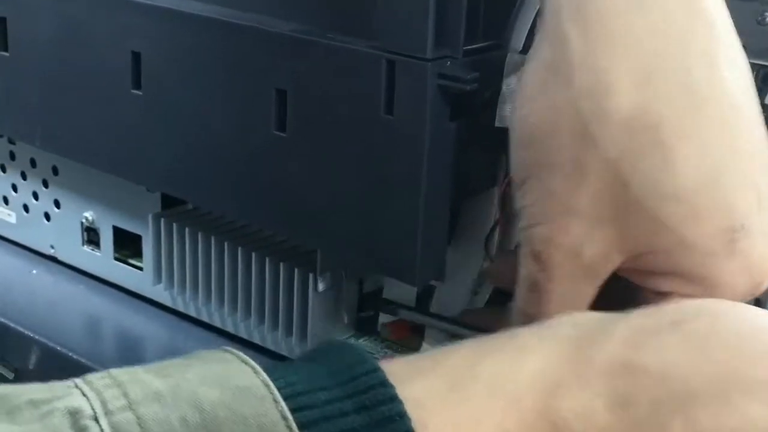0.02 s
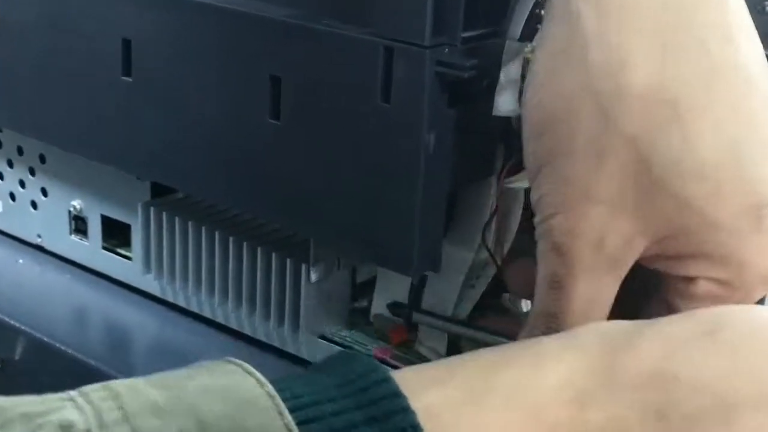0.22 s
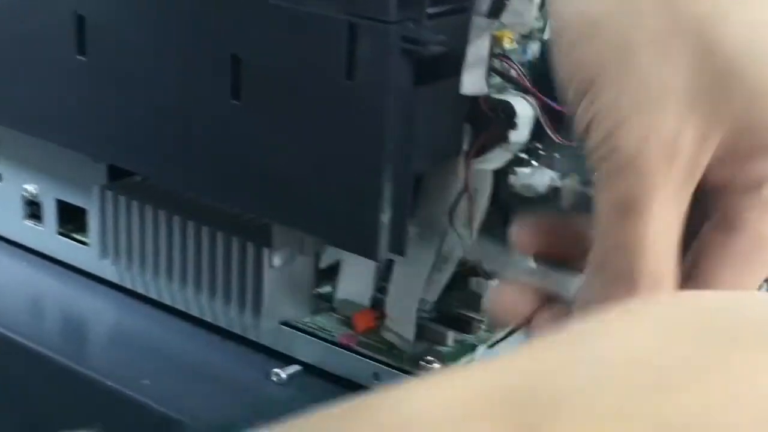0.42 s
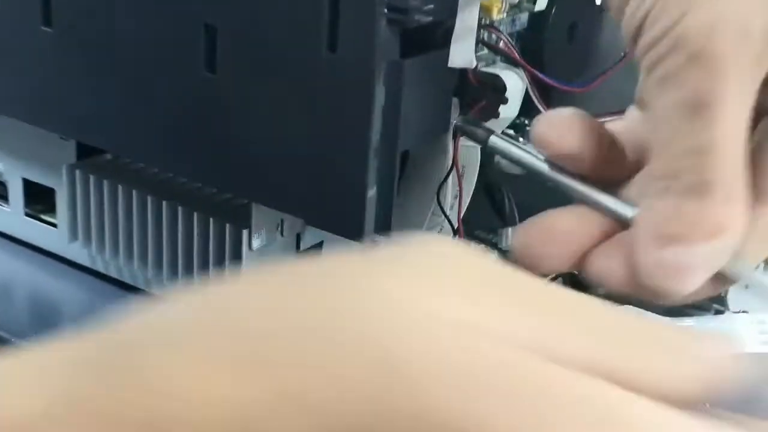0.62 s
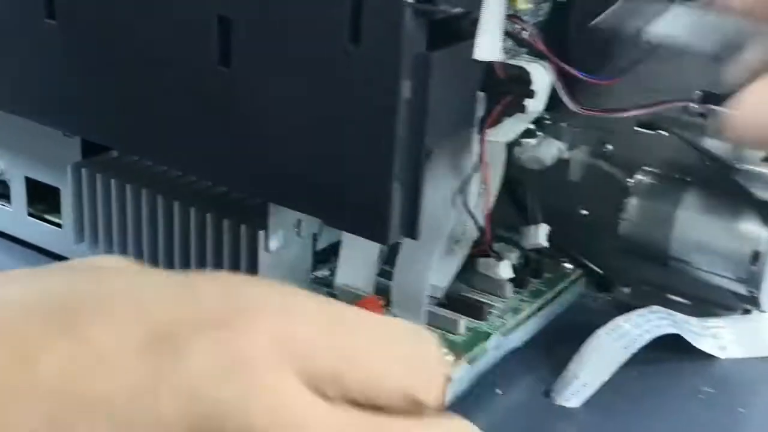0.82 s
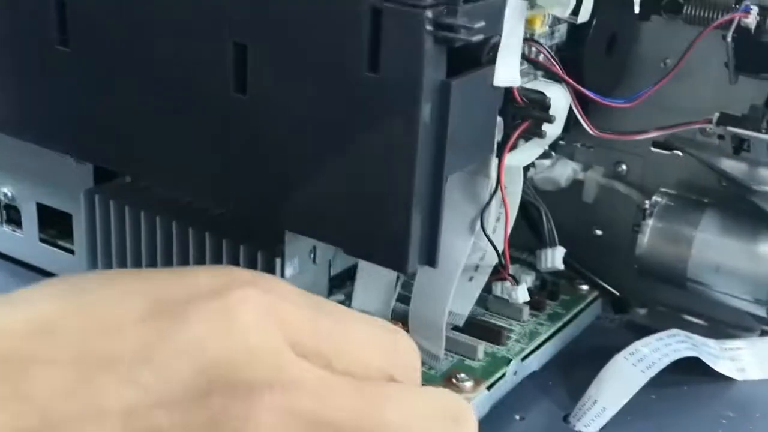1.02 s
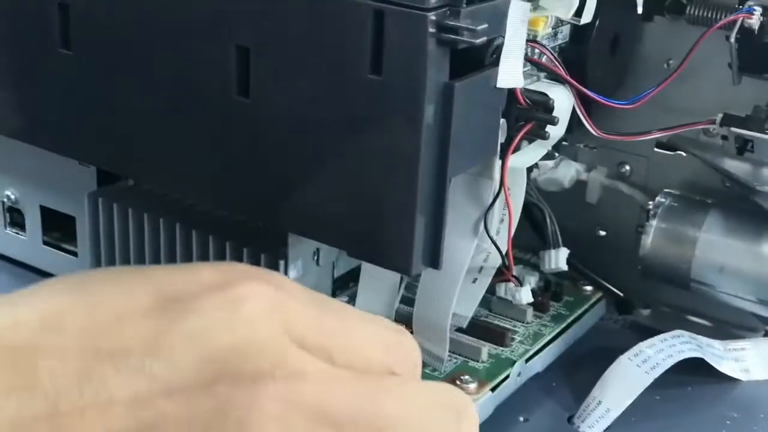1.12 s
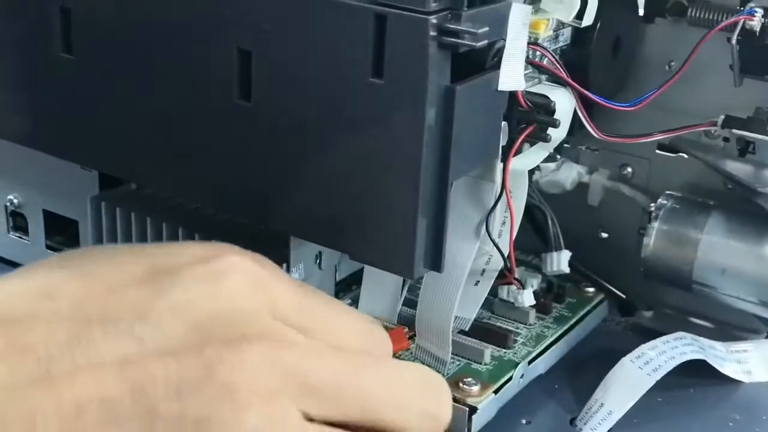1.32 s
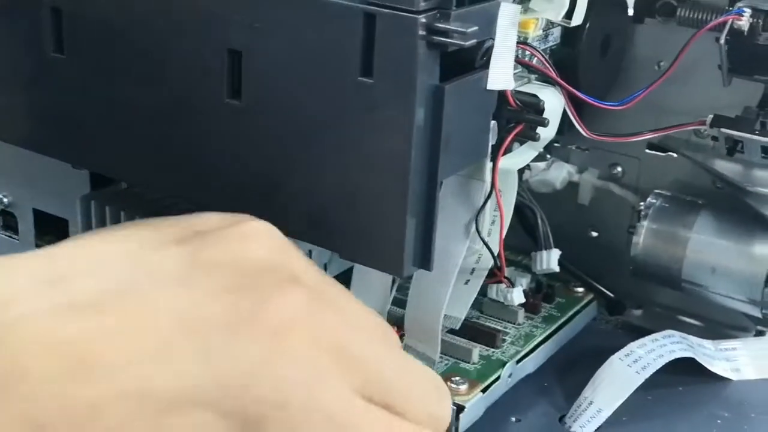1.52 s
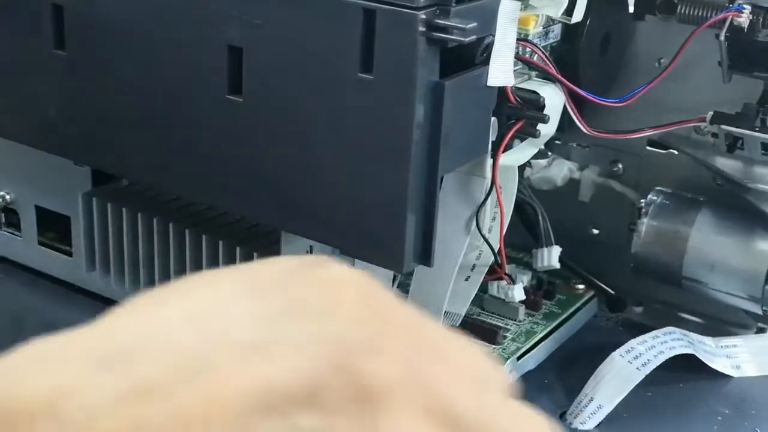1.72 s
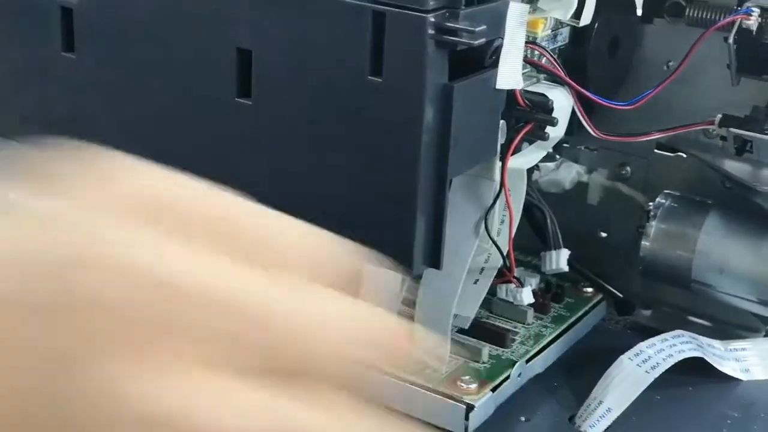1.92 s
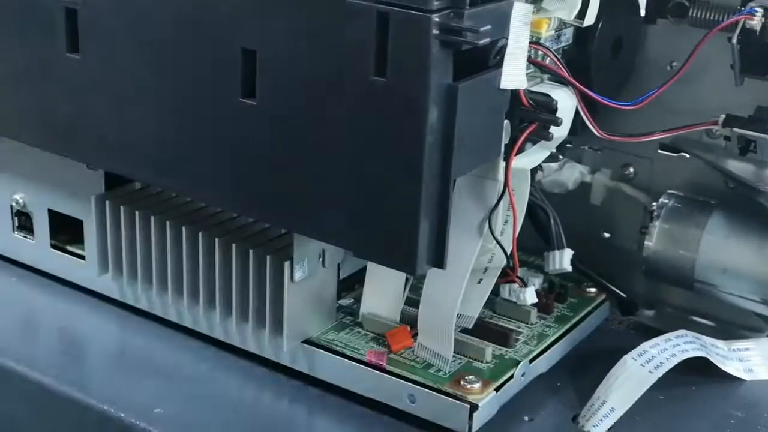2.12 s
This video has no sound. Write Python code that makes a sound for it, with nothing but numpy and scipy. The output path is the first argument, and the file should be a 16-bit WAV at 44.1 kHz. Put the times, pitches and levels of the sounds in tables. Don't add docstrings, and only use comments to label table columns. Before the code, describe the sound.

A screwdriver clicks faintly inside an open printer from 0.05 to 0.16 s, then knocks and rattles brightly on thin sheet metal at 0.22-0.49 s, with brief steel ringing and plastic thuds. A strong clack lands near 0.58 s, trailing small clicks until 0.7 s. Quiet room hiss and low hum remain; faint finger touches at 1.1-1.2 s, a crisp double tap at 1.45 s, soft sleeve rustle around 1.85 s.

```python
import sys
import numpy as np
from scipy import signal
from scipy.fft import rfft, irfft, next_fast_len
from scipy.io import wavfile
from scipy.ndimage import uniform_filter1d, map_coordinates

SR = 44100
rng = np.random.default_rng(int(sys.argv[2]) if len(sys.argv) > 2 else 0)


def pcm_store(signal):
    levels = np.round(np.clip(np.atleast_2d(signal), -1, 1) * 32767)
    wavfile.write(sys.argv[1], SR, levels.astype(np.int16).T)


def to_linear_factor(level_db):
    exponent = np.asarray(level_db, float) / 20
    return 10 ** exponent


N = 97020

# (frequency [Hz], density [dB per Hz])
HISS_COLOUR = [(300, -5), (600, -8), (1300, -7.5), (2000, -2.5), (2800, -2.5), (3800, -14.5), (7700, -10.5),
               (8800, -28.5)]
# (frequency [Hz], density [dB per Hz])
RUMBLE_COLOUR = [(12, -34), (20, -5.5), (49, 0.5), (70, -4.5), (193, -12), (400, -28), (520, -30),
                 (880, -120)]
# (frequency [Hz], correlation [-1..1])
PORT_LIKENESS = [(60, 1), (180, 0.95), (550, -0.34), (1650, 0.36), (4970, -0.44), (15000, 0.46)]
# (frequency [Hz], left minus right [dB])
HISS_BALANCE = [(60, 5), (180, -7), (550, 0), (1650, -6), (4970, -5.0), (15000, 0)]
# (frequency [Hz], left minus right [dB])
NEAR_BALANCE = [(400, 7), (1400, -4.5), (2800, -6.5), (5600, -1.5), (10000, 1.5), (14000, 3.5)]
# (frequency [Hz], t60 [s])
ROOM_DECAY = [(300, 0.53), (2500, 0.26), (8000, 0.22), (9300, 0.034), (14000, 0.044)]
# (time [s], length [s], frequency [Hz], level [dB])
PUSHES = [
    (0.053, .15, 326, -66.5),
    (0.19, 0.14, 219, -60.5),
    (0.287, 0.16, 133.5, -52.5),
    (0.394, 0.14, 327, -61.5),
    (0.558, 0.13, 203, -55),
    (0.615, 0.096, 396, -65),
    (1.374, 0.099, 163, -57),
]
# (start [s], rise [s], hold [s], fall [s], level [dB])
SLEEVE_STROKES = [
    (1.736, 0.062, 0.057, .03, -66.5),
    (1.835, 0.038, 0.064, 0.024, -55.5),
]
# (frequency [Hz], density [dB per Hz])
CLOTH_COLOUR = [(1200, -22), (2000, -5.5), (4000, -10), (7000, 1), (8200, -4), (9000, -24), (16000, -32)]
# (start [s], rise [s], hold [s], fall [s], level [dB], treble [dB])
RUBS = [
    (0.012, 0.059, 0.1, 0.1, -44.5, -14),
    (0.253, 0.012, 0.296, 0.043, -44, -1),
    (0.59, 0.0045, 0.078, 0.12, -39.5, -15),
    (1.149, 0.017, 0.047, .06, -50.5, -31),
    (1.435, 0.0065, 0.02, 0.048, -51, -3.5),
]
# (time [s], shaft level [dB], screw level [dB])
STEEL_HITS = [
    (0.2207, -32.5, -46.5),
    (0.249, -44, -33.5),
    (0.31, -70, -36),
    (0.341, -43.5, -42),
]
# (frequency [Hz], level [dB], t60 [s])
SHAFT_MODES = [(2530, 0, .09), (7557, 2, .045), (9700, -9, .16), (11900, -18, .03), (15000, -8, .025)]
# (frequency [Hz], level [dB], t60 [s])
SCREW_MODES = [(4358, -2, .25), (4500, -7, .12), (4634, -4, .3), (5980, -1, .18)]
# (time [s], frequency [Hz], level [dB], t60 [s])
PINGS = [
    (.088, 3900, -44, .04),
    (.145, 4200, -39, .05),
    (1.174, 4634, -65, .6),
    (1.46, 2260, -51, .28),
    (1.48, 2918, -61, .45),
    (1.61, 2918, -62, .45),
]
# (time [s], peak level [dB], frequency [Hz])
TICKS = [(.0678, -31, 2100), (.0885, -35, 2300), (.1128, -29, 2500), (.1135, -36, 7500), (.1582, -35, 2400),
         (.2212, -34, 14500), (.2488, -13, 7600), (.2509, -8, 7300), (.3122, -22, 4500), (.3532, -17, 5000),
         (.4029, -12, 7600), (.4052, -20, 4000), (.4492, -22, 7400), (.4752, -22, 7000), (.5734, -16, 4900),
         (.5755, -19, 2600), (.5856, -21, 7800), (.5864, -22, 4900), (.625, -30, 2600), (.668, -32, 2500),
         (.706, -34, 2400), (1.455, -29, 6000)]
# (time [s], level [dB], t60 [s])
THUDS = [
    (.157, -43, 0.064),
    (.25, -60, 0.032),
    (.401, -29.5, 0.06),
    (.448, -39.5, 0.12),
    (.572, -32.5, 0.1),
    (.584, -24, 0.04),
    (.625, -43.5, 0.14),
    (1.453, -52.5, 0.093),
]
# (frequency [Hz], width [Hz], level [dB])
CASE_MODES = [(474, 92, -10.5), (630, 130, -6), (862, 145, 0), (1057, 120, 2), (1294, 120, 0)]
# (time [s], peak level [dB], treble re body [dB], struck spot [Hz], t60 [s])
PRYING = [
    (.045, -40, -21, 1500, 0.094),
    (0.064, -29, -11, 1920, 0.036),
    (.067, -27.5, -29, 2090, 0.044),
    (0.088, -42, -23, 1910, 0.037),
    (0.1116, -30.5, -1.5, 2420, 0.04),
    (0.13, -42, -19, 1940, 0.083),
    (.157, -41, -3, 1830, 0.024),
]
# (time [s], peak level [dB], treble re body [dB], struck spot [Hz], t60 [s])
KNOCKS = [(0.2203, -34, -1, 2440, 0.056), (0.2481, -16, 10.5, 2720, 0.021), (0.2503, -12.5, 10, 2700, 0.03),
          (0.261, -21, -2, 2540, 0.072), (.309, -22, -6.5, 2920, 0.1), (.341, -24, -10, 2520, 0.16),
          (0.351, -17.5, 5, 2320, 0.1), (.4008, -11, 1.5, 1890, 0.026), (.404, -12.5, 5.5, 1930, 0.04),
          (.411, -22, -0.5, 1780, 0.035), (0.4414, -25, 10.5, 2360, 0.093), (.447, -17, 3.5, 1770, 0.044),
          (.473, -20, 2, 1900, 0.052), (0.488, -25.5, 11, 2130, 0.06), (.572, -14, -5.5, 2600, 0.03),
          (.5845, -17, 2.5, 2280, 0.018), (0.6, -29.5, -50, 2180, 0.027), (0.622, -37, -24, 2600, 0.059),
          (0.668, -35.5, -15, 2410, 0.015), (.703, -35.5, -8.5, 2350, 0.043)]
# (time [s], peak level [dB], treble re body [dB], struck spot [Hz], t60 [s])
TAPS = [
    (1.103, -49.5, -13, 1910, 0.099),
    (1.171, -44.5, -5.5, 2630, 0.08),
    (1.19, -48, -13, 2320, 0.066),
    (1.4452, -31, 5, 2130, 0.053),
    (1.454, -31, 6, 2150, 0.037),
    (1.471, -52, -8, 2200, 0.025),
    (1.49, -53, 0, 2220, 0.032),
]
# (frequency [Hz], width [Hz], level [dB])
FRAME_MODES = [(1704, 20, 1.5), (1890, 64, 9.5), (2090, 19, -10), (2300, 21.6, 0.5), (2600, 150, 2),
               (2816, 33, 8.5), (3780, 60, 3), (4683, 110, -2), (5590, 38, -29), (6055, 43, -15),
               (6300, 48, -10), (7320, 53, 15), (7760, 82, 8.5), (8090, 71, 5)]
# (frequency [Hz], density [dB per Hz])
CRACK_COLOUR = [(300, -33), (800, -19), (1700, -4), (2700, -0.5), (7800, -2), (8800, -8.5), (10200, -25.5),
                (16000, -33.5)]

SPLIT_HZ, EDGE_HZ = 3140, 9000
MODE_SCATTER_DB, DETUNE = 3, .012


def unit(x):
    return x / np.sqrt(np.mean(x ** 2) + 1e-20)


def along(points, hz):
    f, v = np.transpose(points)
    return np.interp(np.log(hz + 1), np.log(f + 1), v)


def wobble(rate, size):
    knots = rng.standard_normal(int(size * rate / SR) + 4)
    return map_coordinates(knots, [np.arange(size) * rate / SR])


def filtered(x, response):
    m = next_fast_len(x.shape[-1] + 4096)
    return irfft(rfft(x, m) * response(np.fft.rfftfreq(m, 1 / SR)), m)[..., :x.shape[-1]]


def high(f):
    return 1 / (1 + (SPLIT_HZ / (f + 1)) ** 6)


def above(f):
    return 1 / (1 + (EDGE_HZ / (f + 1)) ** 20)


def sides(points, lag_s):
    def response(f):
        left = to_linear_factor(along(points, f) / 2) * np.exp(-2j * np.pi * f * lag_s)
        return np.array([left, to_linear_factor(-along(points, f) / 2)])
    return response


def stroke(s, rise, hold, fall):
    corners = [s, s + rise, s + rise + hold, s + rise + hold + fall]
    return np.interp(np.arange(N) / SR, corners, [0, 1, 1, 0]) ** 2


def rush(spectrum, patchy_db):
    z = signal.stft(rng.standard_normal((2, N + 512)), nperseg=512)[2]
    field = uniform_filter1d(rng.standard_normal(z.shape[1:]), size=6, axis=0)
    field = uniform_filter1d(field, size=8, axis=1)
    pair = signal.istft(z * to_linear_factor(patchy_db * unit(field)), nperseg=512)[1][:, :N]

    def mid_side(hz):
        turn = np.arccos(np.clip(along(PORT_LIKENESS, hz), -1, 1)) / 2
        return to_linear_factor(along(spectrum, hz)) * np.array([np.cos(turn), np.sin(turn)])

    mid, side = filtered(pair, mid_side)
    return unit(np.array([mid + side, mid - side]))


def rumble():
    return to_linear_factor(-56.5) * rush([(6.9, -2)] + RUMBLE_COLOUR + [(700, -54.0)], patchy_db=1.5)


def hiss():
    level_db, lag_s, share = -63.5, 0.00057, 0.11
    colour = [(150, -69)] + HISS_COLOUR + [(15000, -36.5), (16400, -70)]
    source = np.tile(rush(colour, patchy_db=1)[0], (2, 1))
    from_right = filtered(source, sides([(1, 0)], lag_s))
    around = rush(colour, patchy_db=1)
    mix = np.sqrt(1 - share) * around + np.sqrt(share) * from_right
    return filtered(to_linear_factor(level_db) * mix, sides(HISS_BALANCE, 0))


def room(x):
    hz, t, z = signal.stft(rng.standard_normal((2, SR // 2)), SR, nperseg=256)
    tail = signal.istft(z * to_linear_factor(-60 * t / along(ROOM_DECAY, hz)[:, None]), SR, nperseg=256)[1]
    late = np.pad(x, ((0, 0), (300, 0)))
    return signal.fftconvolve(late, tail / np.linalg.norm(tail[0]), axes=1)[:, :N]


def bench():
    out = np.zeros(N)
    for s, length, hz, db in PUSHES:
        octave_band = lambda f: np.exp(-(np.log2((f + 1) / hz) / .5) ** 2)
        thrum = unit(filtered(rng.standard_normal(N), octave_band))
        out += to_linear_factor(db) * stroke(s, 0.29 * length, 0.52 * length, 1.2 * length) * thrum
    return out


def sleeve():
    cloth = rush(CLOTH_COLOUR, patchy_db=0.0) * to_linear_factor([[-4], [4]])
    return sum(to_linear_factor(db) * stroke(*shape) for *shape, db in SLEEVE_STROKES) * cloth


def rubs():
    grain_db = 1.5 * (wobble(300, size=N) + wobble(90, size=N))
    noise = rush(CRACK_COLOUR, patchy_db=2) * to_linear_factor(grain_db)
    dull = filtered(noise, lambda f: 1 - high(f))
    bright = filtered(noise, lambda f: high(f) * (1 - above(f)))
    return sum(stroke(*shape) * to_linear_factor(db) * (dull + to_linear_factor(treble_db) * bright)
               for *shape, db, treble_db in RUBS)


def rings():
    out, t = np.zeros((2, N + SR)), np.arange(SR // 2) / SR
    tones = list(PINGS)
    for s, shaft_db, screw_db in STEEL_HITS:
        tones += [(s, hz, shaft_db + db, t60) for hz, db, t60 in SHAFT_MODES]
        tones += [(s, hz, screw_db + db, t60) for hz, db, t60 in SCREW_MODES]
    for s, hz, db, t60 in tones:
        drift = 0.6 * wobble(25 / t60, size=len(t))
        phase = 2 * np.pi * (hz * t + rng.random()) + drift + np.array([[0], [1]])
        level_db = db - 60 * t / t60 + 1.8 * wobble(20 / t60, size=len(t))
        start = round(s * SR)
        out[:, start:start + len(t)] += np.sin(phase) * to_linear_factor(level_db) * (1 - np.exp(-t / .001))
    return out[:, :N]


def ticks():
    out, t = np.zeros((2, N + SR)), np.arange(SR // 100) / SR
    for s, db, hz in TICKS:
        width_hz = .13 * np.sqrt(hz * 4000)
        cycles = np.sin(2 * np.pi * (hz * t + rng.random((2, 1)))) * np.exp(-np.pi * width_hz * t)
        start = round(s * SR)
        out[:, start:start + len(t)] += to_linear_factor(db + 8) * cycles * (1 - np.exp(-t / .0003))
    return out[:, :N]


def chatter(t, t60):
    alike, spiky_db, rise_s = 0.21, 1.5, 0.0023
    snap_db, snap_t60 = 2.5, 0.0041
    a, b = rng.standard_normal((2, len(t)))
    slips = np.array([a, alike * a + np.sqrt(1 - alike ** 2) * b])
    slips *= to_linear_factor(spiky_db * wobble(945, size=len(t)))
    decay = to_linear_factor(-60 * t / t60) + to_linear_factor(snap_db - 60 * t / snap_t60)
    return slips * decay * (1 - np.exp(-t / rise_s))


def modes(table, f):
    total = 0
    for k, (centre, width, db) in enumerate(table):
        strength = to_linear_factor(db + MODE_SCATTER_DB * rng.standard_normal((2, 1)))
        hz = centre * (1 + DETUNE * rng.standard_normal())
        total = total + (-1) ** k * strength * 1j * f * width / (hz ** 2 - f * f + 1j * f * width)
    return total


def add(out, s, db, blow):
    start = round(s * SR)
    onset = np.sqrt(np.mean(blow[:, :SR // 120] ** 2))
    out[:, start:start + blow.shape[1]] += to_linear_factor(db - 10.5) * blow / onset


def thuds():
    out, t = np.zeros((2, N + SR)), np.arange(SR // 6) / SR
    case = lambda f: modes(CASE_MODES, f) / (1 + (450 / (f + 1)) ** 4)
    for s, db, t60 in THUDS:
        add(out, s, db, filtered(chatter(t, t60), case))
    return out[:, :N]


def knocks():
    ring_db, focus_db, focus_oct, fizz_db = -4, 8.5, 0.48, 11
    treble_life, fizz_life = 0.76, 0.41
    out, t = np.zeros((2, N + SR)), np.arange(SR // 6) / SR
    body = lambda f: to_linear_factor(along(CRACK_COLOUR, f)) + to_linear_factor(ring_db) * modes(FRAME_MODES, f)
    for s, db, treble_db, spot_hz, t60 in PRYING + KNOCKS + TAPS:
        spot = lambda f: to_linear_factor(focus_db * (np.exp(-(np.log2((f + 1) / spot_hz) / focus_oct) ** 2) - 1))
        low = filtered(chatter(t, t60), lambda f: body(f) * spot(f) * (1 - high(f)))
        top = filtered(chatter(t, treble_life * t60), lambda f: body(f) * high(f) * (1 - above(f)))
        fizz = filtered(chatter(t, fizz_life * t60), lambda f: body(f) * above(f))
        add(out, s, db, low + to_linear_factor(treble_db - focus_db) * (top + to_linear_factor(fizz_db) * fizz))
    return out[:, :N]


def scene():
    contacts = knocks() + thuds() + ticks() + rubs() + sleeve()
    near = filtered(contacts, sides(NEAR_BALANCE, lag_s=.00005))
    near = near + filtered(rings(), sides(NEAR_BALANCE, lag_s=0))
    return near + to_linear_factor(-11.5) * room(near) + hiss() + rumble() + bench()


def band_limit(x):
    return signal.sosfilt(signal.butter(12, 16480, fs=SR, output="sos"), x)


def record(dry):
    top_hz = 15400
    mix = filtered(dry, lambda f: 1 / (1 + (f / top_hz) ** 60))
    return band_limit(mix)


dry = scene()
out = record(dry)
pcm_store(out)
```